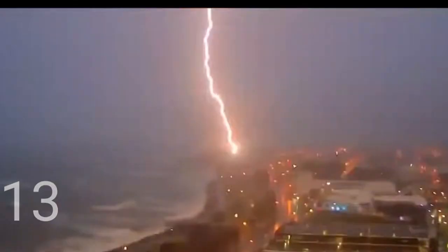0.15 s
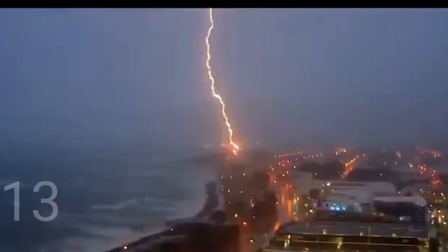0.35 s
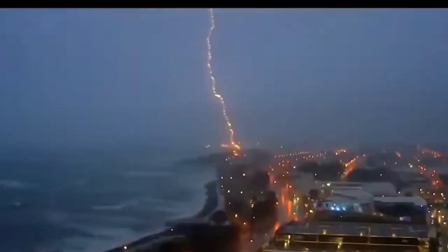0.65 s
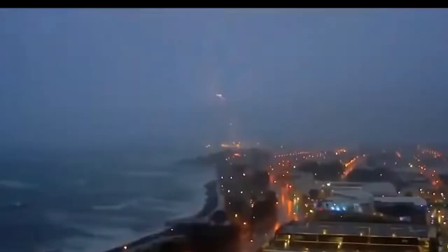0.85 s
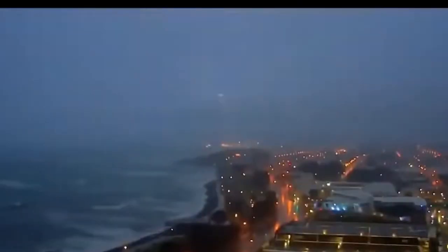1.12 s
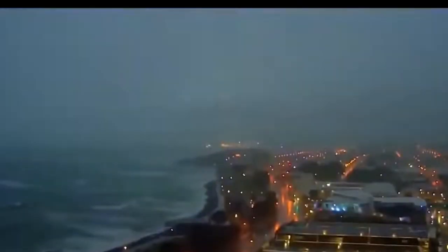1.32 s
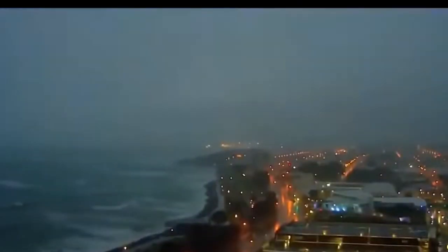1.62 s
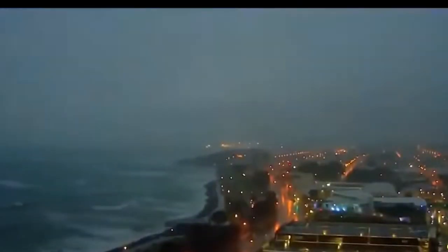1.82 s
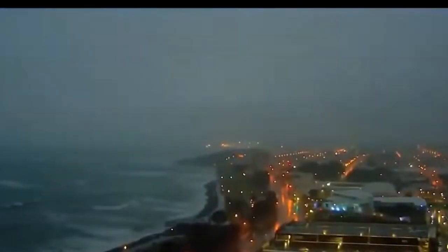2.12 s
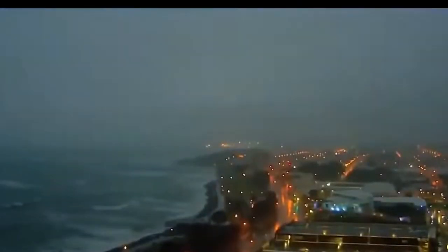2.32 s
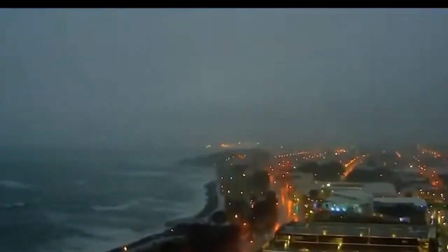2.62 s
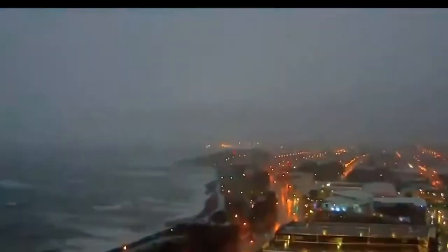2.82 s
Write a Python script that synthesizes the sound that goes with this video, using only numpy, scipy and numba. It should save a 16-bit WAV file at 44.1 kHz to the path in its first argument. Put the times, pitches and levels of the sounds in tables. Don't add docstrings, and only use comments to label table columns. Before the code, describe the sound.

A close thunderclap bursts out of near silence, overloaded and tearing, then breaks into rolling, crackling thunder with separate thumps and cracks; outdoors, high above a coastal city, in stereo with distorted input.

```python
import sys
import numpy as np
from scipy import signal
from scipy.fft import rfft, irfft
from scipy.io import wavfile
from scipy.ndimage import uniform_filter1d
from numba import njit

SR = 44100
rng = np.random.default_rng(int(sys.argv[2]) if len(sys.argv) > 2 else 0)


def inscribe(sig):
    pcm = np.round(np.clip(np.atleast_2d(sig).T, -1, 1) * 32767)
    wavfile.write(sys.argv[1], SR, pcm.astype(np.int16))


def elevation(decibels):
    levels = np.asarray(decibels, float)
    return 10 ** (levels / 20)


N = 130095

CRACKLE_HZ, CRACKLE_SPREAD, CRACKLE_FRONT = 1190, 0.559, 0.15
# (time [s], level [dB], crackle re shocks [dB], left lead [ms])
ROLL_COURSE = [(0.218, -48.5, 5, 0.4), (.45, -54, 7, .3), (.6, -48.5, -7.5, 0.28), (.78, -46, -9, 0.26),
               (1, -51, -4.5, 0.29), (1.301, -43, -14, 0.2), (1.549, -48.5, -14.5, 0.12),
               (1.851, -46.5, -14.5, 0.21), (2.018, -49.5, -15.5, 0.054), (2.3, -50, -11.5, -0.21),
               (2.6, -47, -14.5, -0.12), (2.95, -52, -10, -0.18)]


@njit
def add_shocks(out, at, span, size, front):
    for k in range(len(at)):
        first = int(at[k]) + 1
        last = min(int(at[k] + span[k]) + 1, len(out))
        for i in range(first, last):
            u = (i - at[k]) / span[k]
            edge = min(min(u, 1 - u) / front, 1.)
            out[i] += size[k] * (1 - 2 * u) * edge * edge * (3 - 2 * edge)


def shocks(t, db, hz, spread, front, per_s, chance=1):
    span_cycles, scatter_db, bearing_ms = .76, 2.0, .08
    length_draw, size_draw, sign_draw, bearing_draw = chance * rng.standard_normal((len(t), 4)).T
    stretch = np.exp(spread * length_draw)
    span = span_cycles * SR / hz * stretch
    size = elevation(db + scatter_db * size_draw) * np.sqrt(4 * hz / per_s / stretch)
    size = size * np.where(sign_draw > -1, 1., -1.)
    course = np.array(ROLL_COURSE)
    lead = (np.interp(t, course[:, 0], course[:, 3]) + bearing_ms * bearing_draw) * SR / 1000
    out = np.zeros((2, N))
    for side, sign in zip(out, (-.5, .5)):
        add_shocks(side, t * SR + sign * lead, span, size, float(np.clip(front, .01, .5)))
    return out


def crowds(start, length, db, hz, spread, front, count):
    attack_s, release_s, sag_db = 0.002, 0.008, -0.5
    u = ((np.arange(count) + rng.random((len(start), count))) / count).ravel()
    start, length, db, hz = (np.repeat(v + 0 * start, count) for v in (start, length, db, hz))
    swell = np.minimum(u * length / attack_s, (1 - u) * length / release_s)
    db = db + sag_db * u + 10 * np.log10(np.clip(swell, .05, 1))
    return shocks(start + u * length, db, hz, spread, front, count / length)


def claps(table):
    zigzag_db, zigzag_q = -4, 2
    rows = np.array(table, float)
    start, length, db, hz, crackle_db = rows.T
    out = crowds(start, length, db + crackle_db, CRACKLE_HZ, CRACKLE_SPREAD, CRACKLE_FRONT, count=400)
    for row in rows[:, :4, None]:
        body = crowds(*row, spread=0.37, front=0.17, count=45)
        hum = signal.lfilter(*signal.iirpeak(row[3, 0], zigzag_q, fs=SR), body)
        out = out + body + elevation(zigzag_db) * hum
    return out


def main_claps():
    # (start [s], length [s], level [dB], shock pitch [Hz], crackle re shocks [dB])
    clap_rows = [(.2225, 0.098, -26.5, 270, -19.5), (.31, 0.076, -33, 256, -12.5),
                 (.38, 0.058, -43, 234, -10), (.428, 0.085, -44, 266, -12), (.675, 0.072, -48, 134, -7),
                 (.74, .12, -50.5, 400, -11), (.868, 0.05, -45.5, 280, -3.5),
                 (1.025, 0.024, -52.5, 200, -11.5), (1.13, 0.044, -59, 260, -11),
                 (1.185, .065, -54.5, 300, -2.5), (1.255, 0.074, -44.5, 200, -8),
                 (1.362, .025, -60, 224, -23), (1.395, 0.066, -48.5, 238, -6),
                 (1.667, 0.044, -47.5, 200, -19), (1.705, 0.049, -50, 308, -20),
                 (1.79, 0.055, -45, 264, -14), (1.909, 0.039, -46.5, 270, -5),
                 (2.09, 0.062, -47.5, 264, -17), (2.2, 0.086, -48.5, 336, -15),
                 (2.452, .06, -49.5, 319, -13.5), (2.508, 0.066, -49, 266, -17),
                 (2.645, 0.074, -55.5, 312, -23), (2.80, 0.032, -61, 200, -13), (2.885, .04, -52, 267, -26)]
    return claps(clap_rows)


def tearing():
    # (start [s], length [s], level [dB])
    snap_rows = [(0.219, .01, -41), (0.228, 0.049, -35), (0.277, .05, -44), (0.307, 0.05, -37.5),
                 (0.33, 0.045, -64), (0.423, .15, -89), (0.69, 0.064, -59.5), (0.866, 0.06, -67),
                 (1.273, 0.046, -72), (1.417, 0.064, -74.5), (1.908, .05, -57.5)]
    return crowds(*np.array(snap_rows).T, hz=6600, spread=CRACKLE_SPREAD, front=0.046, count=700)


def lone_cracks():
    # (time [s], level [dB], pitch [Hz])
    crack_rows = [(0.2227, -25, 255), (.701, -48.5, 330), (.733, -41, 407), (.81, -42.5, 504),
                  (0.88, -38, 254), (1.151, -49, 460), (1.678, -43, 500), (1.806, -37.5, 200),
                  (2.099, -48, 437), (2.123, -41, 310), (2.164, -45, 406), (2.465, -46.5, 450),
                  (2.665, -46, 350), (2.819, -46.5, 432), (2.899, -55, 447), (0.932, -47.5, 256),
                  (1.029, -39, 200), (1.284, -46, 200), (1.416, -39.5, 243), (1.462, -60, 200),
                  (1.6717, -41, 211), (1.721, -43, 310), (1.7924, -39.5, 239), (1.9046, -32, 494),
                  (2.212, -39, 258), (2.235, -34.5, 233), (2.487, -44, 500), (2.534, -37.5, 213)]
    t, db, hz = np.array(crack_rows, float).T
    return shocks(t, db, hz, 0, 0.29, hz, chance=0)


def booms():
    # (start [s], length [s], level [dB], pitch [Hz])
    hum_rows = [(.218, 0.063, -14, 178.9), (.225, 0.13, -28.5, 68.2), (.26, 0.036, -23.5, 297.4),
                (.285, 0.039, -19.5, 174.2), (.31, 0.026, -21, 402.7), (.318, 0.043, -21, 78.1),
                (.34, 0.036, -28.5, 272), (.355, 0.05, -29.5, 201.4), (.395, 0.033, -34.5, 70),
                (.435, 0.023, -30.5, 280), (.475, 0.034, -35, 78.4), (.56, 0.047, -50, 71.4),
                (.64, .1, -45, 75.8), (.68, 0.036, -42, 158.4), (.81, 0.041, -46, 888),
                (1.921, 0.028, -42.5, 247), (0.871, 0.06, -49, 71.5), (1.01, 0.053, -54.5, 75.7),
                (1.25, 0.064, -35, 148.6), (1.255, .06, -43.5, 71.5), (1.36, 0.021, -42, 277.7),
                (1.375, 0.056, -45.5, 71.3), (1.395, 0.041, -39, 263.3), (1.46, .07, -51, 72.6),
                (1.665, 0.052, -47.5, 200), (1.705, 0.042, -38, 285.4), (1.785, 0.032, -38.5, 190.4),
                (1.815, 0.028, -36, 226.4), (2.085, 0.041, -42, 72), (2.105, 0.046, -35.5, 166.3),
                (2.195, 0.049, -38.5, 126.5), (2.24, 0.056, -46, 66), (2.45, 0.055, -44.5, 75.5),
                (2.45, 0.019, -44, 200), (2.505, 0.042, -36, 206.8), (2.64, 0.042, -52, 70.3),
                (2.655, 0.056, -45, 200), (2.75, 0.031, -55, 70), (2.79, 0.038, -45.5, 145),
                (0.422, 0.036, -35.5, 431), (.445, 0.047, -32, 175.4), (0.726, 0.042, -49.5, 373),
                (.868, .04, -37, 164.4), (.875, 0.028, -40.5, 352), (1.265, 0.035, -39.5, 200),
                (1.27, 0.033, -48, 426.6), (1.905, 0.032, -39.5, 377), (2.09, 0.031, -48.5, 540.4),
                (2.223, 0.034, -49.5, 679), (2.71, 0.022, -48.5, 214.6)]
    lift_db = 4
    widening = .1
    start, length, db, hz = np.array(hum_rows, float).T[:, :, None]
    late = np.arange(.5, 45) / hz * (1 + widening * np.arange(45) / 10)
    swell = np.sin(np.pi * np.minimum(late / length, 1)) + 1e-6
    level = db + lift_db + 20 * np.log10(swell)
    t, db, hz = ((v + 0 * late).ravel() for v in (start + late, level, hz))
    return shocks(np.minimum(t, N / SR), db, hz, 0, .45, hz, chance=0)


def roll():
    strike_s = .2215
    long_s = N / SR - strike_s
    course = np.array(ROLL_COURSE)
    body = (3500, 0, 200, 0.49, 0.26)  # count, share of crackle level, pitch [Hz], spread, front
    crackle = (16000, 1, CRACKLE_HZ, CRACKLE_SPREAD, CRACKLE_FRONT)
    out = 0
    for count, share, hz, spread, front in (body, crackle):
        t = strike_s + long_s * rng.random(count)
        db = np.interp(t, course[:, 0], course[:, 1] + share * course[:, 2])
        out = out + shocks(t, db, hz, spread, front, count / long_s)
    return out


def side_branch():
    # (start [s], length [s], level [dB], shock pitch [Hz], crackle re shocks [dB])
    branch_rows = [
        (.095, 0.036, -80, 303, -1),
        (.124, 0.03, -67, 288, -6.5),
        (.141, .025, -67.5, 283, -0.5),
        (.166, 0.17, -69, 310, -4),
    ]
    return signal.sosfilt(signal.butter(4, 3300, fs=SR, output="sos"), claps(branch_rows))


def shape(x, points):
    hz, db = np.array(points, float).T
    size = 8192
    bins_hz = np.arange(size // 2 + 1) * SR / size
    log_gain = np.interp(np.log(bins_hz + 1), np.log(hz), db) * np.log(10) / 20
    cepstrum = irfft(log_gain)
    cepstrum[1:size // 2] *= 2
    cepstrum[size // 2 + 1:] = 0
    response = irfft(np.exp(rfft(cepstrum)))[None, :size // 2]
    return signal.fftconvolve(x, response, axes=1)[:, :N]


def air_and_ground(x):
    # (frequency [Hz], level [dB])
    bounce = [(25, -35), (50, -9.5), (78, -3.5), (110, 2), (175, 2), (230, 0.5), (290, -0.5), (400, 1)]
    # (frequency [Hz], level [dB])
    colour = [(400, 0), (700, 2.5), (1150, 2), (2200, 2), (3500, -6.5), (6000, -14), (10000, -19),
              (14000, -19)]
    return shape(x, bounce + colour[1:])


def wide(count):
    mid, side = rng.standard_normal((2, count))
    side = signal.lfilter(*signal.butter(2, 420, "high", fs=SR), side)
    return mid + side * np.array([[1], [-1]])


def echoes(x):
    level_db, split_hz = -8, 4000
    t60_s, treble_t60_s = 0.41, 0.9
    t = np.arange(SR) / SR
    tail = wide(SR)
    low = signal.lfilter(*signal.butter(1, split_hz, fs=SR), tail)
    tail = low * elevation(-60 * t / t60_s) + (tail - low) * elevation(-60 * t / treble_t60_s)
    gain = elevation(level_db) / np.sqrt(t60_s * SR / np.log(1e6))
    return gain * signal.fftconvolve(x.mean(0)[None], tail, axes=1)[:, :N]


def city():
    # (frequency [Hz], level per Hz [dB])
    murmur = [(15, -27), (25, 0.5), (58, -20.5), (136, -4), (1230, -14.5), (1440, -17), (2030, -17),
              (4990, -23), (14000, -44)]
    x = shape(wide(N), murmur)
    return x * elevation(-87.5) / x.mean(0).std()


def scene():
    strike = side_branch() + main_claps() + roll() + tearing() + lone_cracks()
    direct = air_and_ground(strike) + booms()
    return direct + echoes(direct) + city()


def overload(dry):
    clip_db, knee = -31, 4.5
    ripple_db, ripple_hz = -5.5, 1830
    flat = dry / (1 + np.abs(dry / elevation(clip_db)) ** knee) ** (1 / knee)
    ripple = signal.lfilter(*signal.butter(2, ripple_hz, "high", fs=SR), dry - flat)
    return flat + elevation(ripple_db) * ripple


def ceiling(x):
    ceiling_hz, hz_per_db, at_db = 10300, 125, -90
    ragged_hz, patch_bins, patch_frames = 800, 7, 4
    hz, _, z = signal.stft(x, SR, nperseg=1024)
    treble = z[:, (hz > 5500) & (hz < 9000)]
    power = uniform_filter1d((np.abs(treble) ** 2).sum(1).mean(0), size=5)
    top = ceiling_hz + hz_per_db * (10 * np.log10(power + 1e-14) - at_db)
    patch = rng.standard_normal((len(hz) // patch_bins + 1, len(top) // patch_frames + 1))
    patch = np.repeat(np.repeat(patch, patch_bins, 0), patch_frames, 1)[:len(hz), :len(top)]
    keep = np.clip((top + ragged_hz * patch - hz[:, None]) / 300, 0, 1)
    return signal.istft(z * keep, SR, nperseg=1024)[1][:, :N]


def top_cut(x):
    return signal.sosfilt(signal.butter(12, 15500, fs=SR, output="sos"), x)


def record(dry):
    low_cut_hz, high_cut_hz, hiss_db, fade_s = 32, 15100, -96, .006
    x = signal.lfilter(*signal.butter(1, [low_cut_hz, high_cut_hz], "band", fs=SR), overload(dry))
    hiss = signal.sosfilt(signal.butter(8, 15000, fs=SR, output="sos"), rng.standard_normal(x.shape))
    fade = np.minimum(np.arange(N)[::-1] / SR / fade_s, 1)
    return top_cut((ceiling(x) + elevation(hiss_db) * hiss) * fade)


dry = scene()
out = record(dry)
inscribe(out)
```